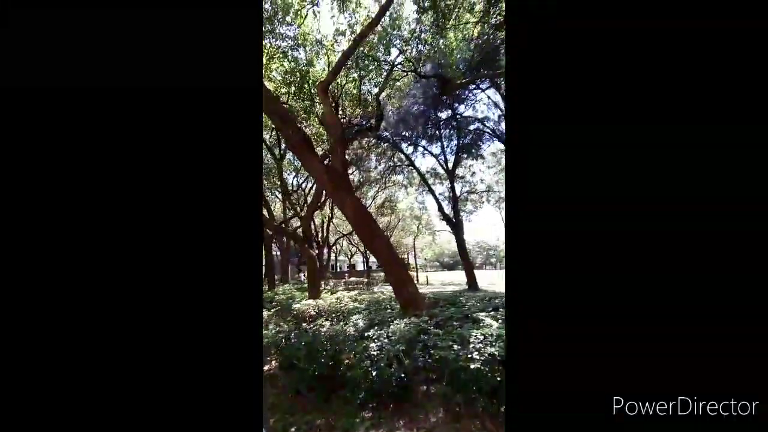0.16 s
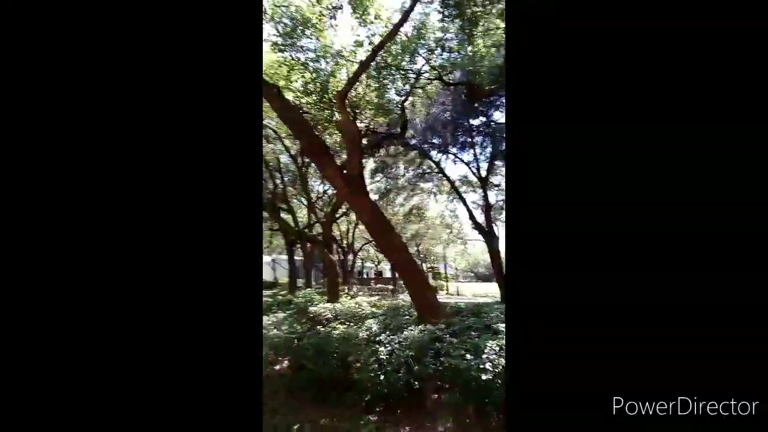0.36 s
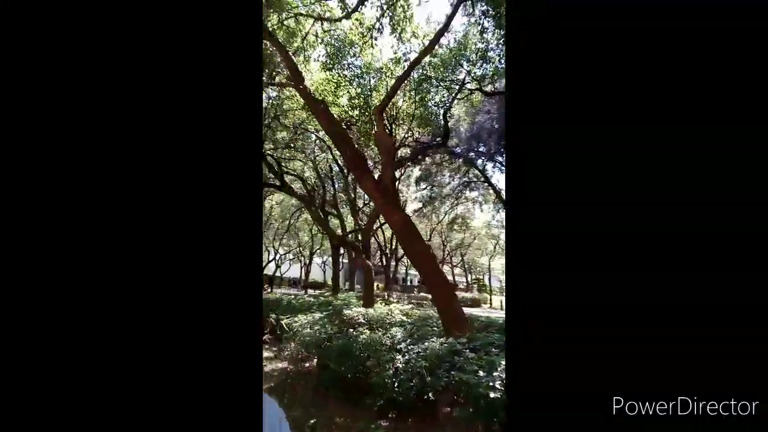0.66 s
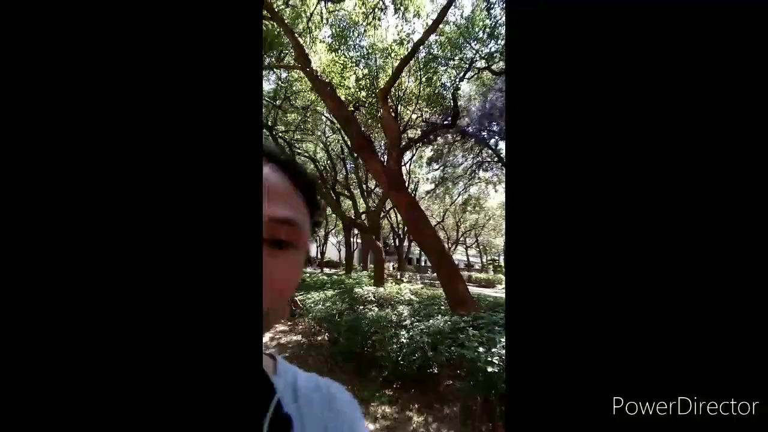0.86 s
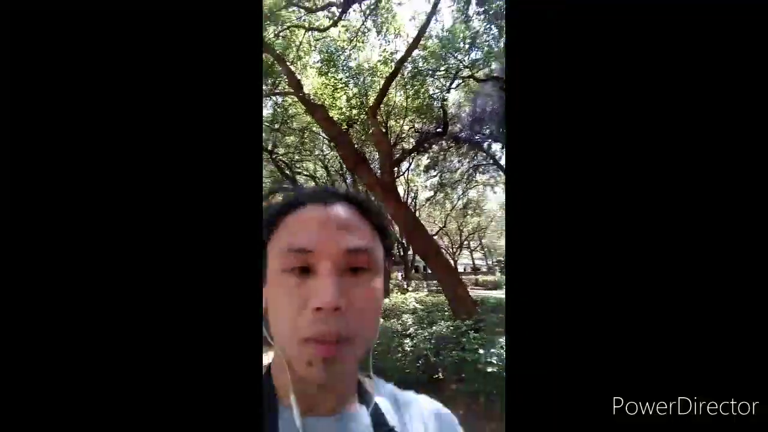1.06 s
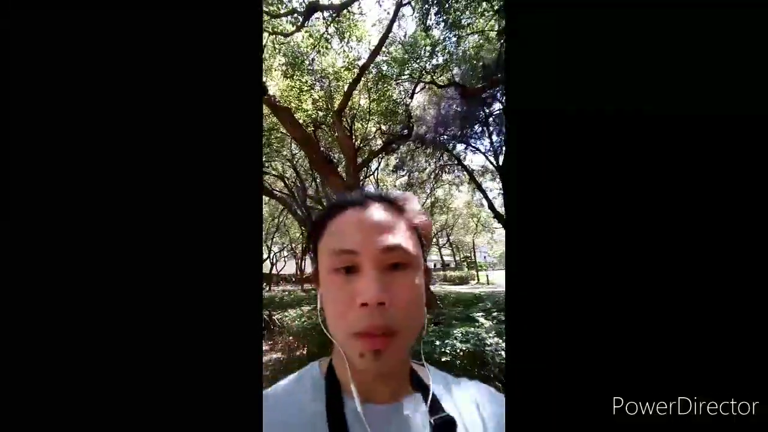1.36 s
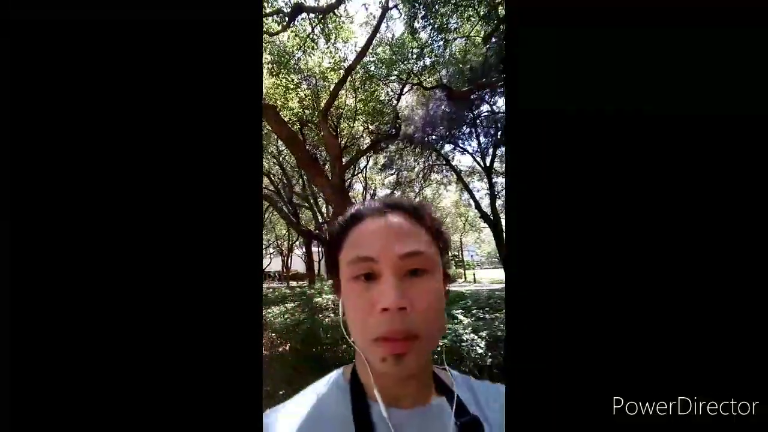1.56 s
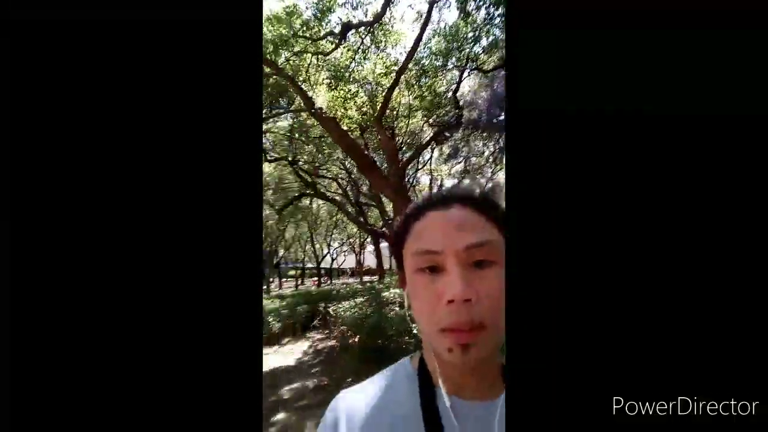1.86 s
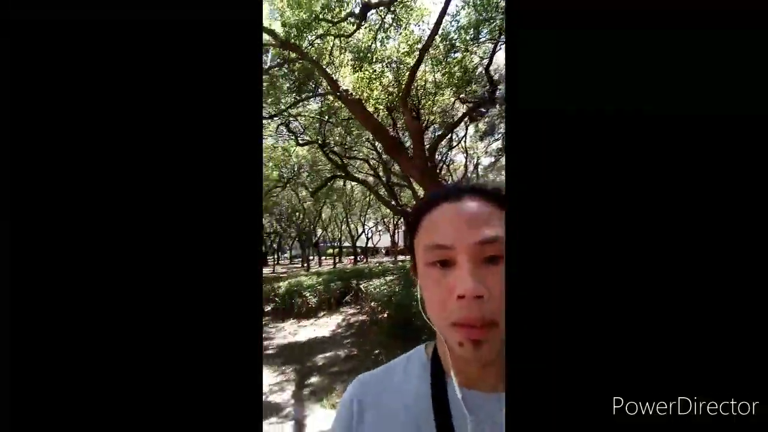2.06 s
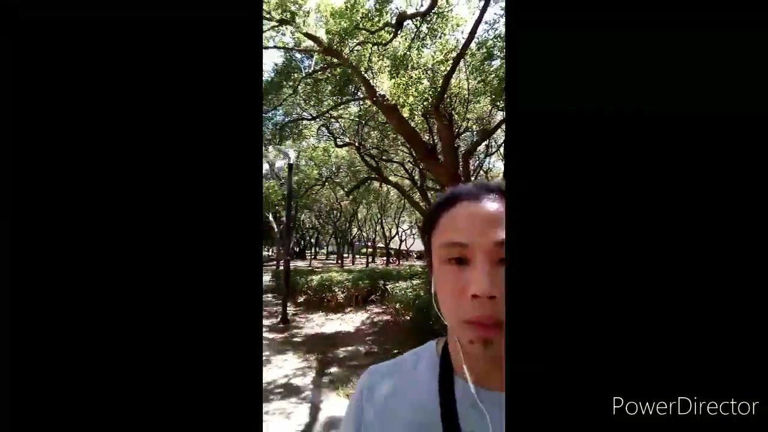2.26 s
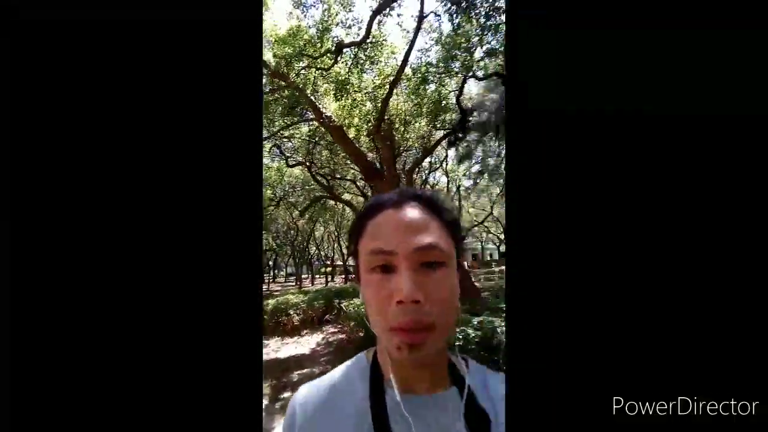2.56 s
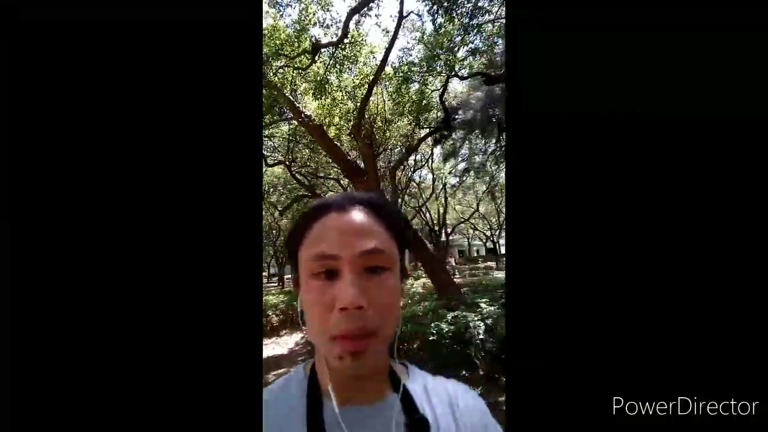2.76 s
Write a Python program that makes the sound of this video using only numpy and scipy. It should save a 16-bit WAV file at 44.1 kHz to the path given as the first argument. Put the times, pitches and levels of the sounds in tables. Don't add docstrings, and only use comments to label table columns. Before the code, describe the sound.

Many cicadas drone continuously around a leafy park, with a nearer singer fading out and returning; small twig ticks, one short hoarse cluck and low far traffic, captured by a phone microphone.

```python
import sys
import numpy as np
from scipy import signal
from scipy.fft import rfft, irfft, next_fast_len
from scipy.io import wavfile
from scipy.ndimage import uniform_filter1d, map_coordinates

SR = 44100
rng = np.random.default_rng(int(sys.argv[2]) if len(sys.argv) > 2 else 0)


def volts(x):
    e = np.asarray(x, float) / 20
    return 10 ** e


def unload_audio(sound):
    columns = np.transpose(np.atleast_2d(sound))
    steps = np.round(np.clip(columns, -1, 1) * 32767)
    wavfile.write(sys.argv[1], SR, steps.astype(np.int16))


N = 127890


def unit(x):
    return x / np.sqrt(np.mean(x ** 2) + 1e-20)


def along(points, hz):
    f, v = np.transpose(points)
    return volts(np.interp(np.log(hz + 1), np.log(f + 1), v, left=-120, right=-120))


def level(rows):
    s, db = np.transpose(rows)
    return volts(np.interp(np.arange(N) / SR, s, db))


def wobble(rate):
    knots = rng.standard_normal(int(N * 40 / SR) + 4)
    return map_coordinates(knots, [np.arange(N) * min(rate, 40) / SR])


def filtered(x, response):
    m = next_fast_len(N + SR // 2)
    return irfft(rfft(x, m) * response(np.fft.rfftfreq(m, 1 / SR)), m)[..., :N]


def clicks(rate_hz, jitter, drift):
    size_db = 3
    turns = np.cumsum(rate_hz * (1 + drift * wobble(3))) / SR + rng.random()
    chance = rng.standard_normal((2, 6000))
    k = np.arange(1, int(turns[-1]))
    at = np.interp(k + jitter * chance[0, k], turns, np.arange(N))
    at = np.clip(at, 8, N - 9)
    taps = at.astype(int)[:, None] + np.arange(-7, 9)
    offset = taps - at[:, None]
    shape = np.sinc(offset) * np.cos(np.pi * offset / 18) ** 2
    size = volts(size_db * chance[1, k])[:, None]
    return np.bincount(taps.ravel(), (shape * size).ravel(), N)


def trees(x, echo_db):
    t60_s = 0.45
    t = np.arange(SR // 2) / SR
    tail = rng.standard_normal(len(t)) * volts(-60 * t / t60_s)
    return x + volts(echo_db) * signal.fftconvolve(x, tail / np.linalg.norm(tail))[:N]


def insect(waver_db):
    rate_hz = 327.6 * np.exp(0.35 * rng.standard_normal())
    return volts(waver_db * wobble(5.84)) * clicks(rate_hz, jitter=0.0401, drift=0.006)


def chorus(body, swell, waver_db, count):
    # centre in Hz, lift in dB.
    sacs = [(4430, 5), (4688, 2), (4803, 5), (5105, 4), (5340, 7), (5510, 5), (5636, 3), (5990, 5),
            (6209, 3), (6440, 5), (6930, 3), (7360, 4), (7965, 2), (8879, 2)]
    sac_width_hz, gust_db = 26, 0.2
    crowd = np.zeros(N)
    for _ in range(count):
        singers = insect(waver_db) + insect(waver_db) + insect(waver_db)
        crowd += trees(singers, 2)

    def response(f):
        lift_db = sum(db * sac_width_hz ** 2 / ((f - hz) ** 2 + sac_width_hz ** 2) for hz, db in sacs)
        return along(body, f) * volts(lift_db)

    return level(swell) * volts(gust_db * wobble(8.14)) * unit(filtered(crowd, response))


def low_species():
    # time in seconds, level in dB.
    swell = [(0.0, -32.5), (0.48, -31.5), (1.26, -31.5), (1.53, -29), (1.66, -30), (2.13, -26),
             (2.19, -26.5), (2.21, -26), (2.29, -27.5), (2.4, -24.5), (2.41, -25.5), (2.9, -26)]
    # frequency in Hz, gain in dB.
    body = [(3180, -55), (5400, -9.5), (5750, -11.5), (5820, -7), (6210, -2.5), (7320, 0.5), (7620, -1.5),
            (8520, -9), (9800, -16), (12700, -21), (21600, -120)]
    return chorus(body, swell, waver_db=1.1, count=5)


def high_species():
    # time in seconds, level in dB.
    swell = [(0.0, -31), (0.02, -35.5), (0.25, -37.5), (0.26, -39), (0.6, -37), (0.61, -38.5),
             (1.82, -32.5), (2.29, -37), (2.3, -37), (2.9, -35)]
    # frequency in Hz, gain in dB.
    body = [(5290, -27), (9000, -7), (9680, -6), (10500, -.5), (11300, -3), (12000, -12.5), (12700, -19),
            (16500, -22.5)]
    return chorus(body, swell, waver_db=0.8, count=4)


def deep_singers():
    # time in seconds, level in dB.
    swell = [(0.0, -40.5), (0.61, -37), (0.99, -39), (1.03, -42), (2.47, -40), (2.71, -44.5), (2.76, -41),
             (2.89, -42.5), (2.9, -35)]
    # frequency in Hz, gain in dB.
    body = [(2000, -21), (3400, -18.5), (3590, -17), (3890, -8), (4150, -6), (4720, 2), (5800, -2),
            (7540, -24), (12800, -120)]
    return chorus(body, swell, waver_db=1, count=5)


def near_singer():
    # time in seconds, level in dB.
    song = [(0, -38.5), (1.3, -83), (1.9, -40), (2.3, -34.5), (2.9, -35.5)]
    # frequency in Hz, gain in dB.
    body = [(4100, -43), (4700, -5), (5340, -3), (6400, -7), (7500, -7), (8200, -42)]
    buckling = trees(clicks(520, jitter=0.018, drift=0.001924), 2)
    ringing = unit(filtered(buckling, lambda f: along(body, f)))
    return level(song) * volts(1.5 * wobble(6.37)) * ringing


def traffic():
    # frequency in Hz, gain in dB.
    colour = [(12, -30), (20, -3), (38, -6), (126, 0.5), (487, -6), (608, -6.5), (1680, -15), (3280, -17),
              (4000, -17), (5200, -52), (8800, -120)]
    # time in seconds, level in dB.
    strength = [(0.0, -43), (1.58, -44.5), (1.61, -46.5), (1.65, -44.5), (2.16, -44), (2.27, -44),
                (2.37, -44.5), (2.9, -43.5)]
    mains_hz, mains_db = 116, -57
    rumble = unit(filtered(rng.standard_normal(N), lambda f: along(colour, f)))
    road = rumble * level(strength) * volts(0.2 * wobble(4.75))
    mains = np.sin(2 * np.pi * mains_hz * np.arange(N) / SR)
    return road + volts(mains_db + 0.5 * wobble(4)) * mains


def twigs():
    # centre time in seconds, centre in Hz, length in seconds, level in dB.
    ticks = [
        (.27, 1200, .035, -51),
        (.609, 11500, .0015, -40),
        (.914, 14600, .004, -42),
        (.888, 1500, .004, -50),
        (2.28, 95, .08, -45),
        (1.91, 2400, .045, -47),
        (2.0, 2000, .05, -51),
    ]
    width = 0.22
    t = np.arange(N) / SR
    out = np.zeros(N)
    for s, hz, length, db in ticks:
        noise = filtered(rng.standard_normal(N), lambda f: np.exp(-(np.log((f + 1) / hz) / width) ** 2))
        out += volts(db) * np.exp(-((t - s) / length) ** 2) * unit(noise)
    return out


def bird():
    # start in seconds, start Hz, end Hz, length in seconds, level in dB.
    notes_sung = [(1.849, 1750, 1650, .012, -46), (1.865, 1750, 1650, 0.0083, -39),
                  (1.869, 3000, 2490, 0.011, -36.5), (1.876, 2500, 2110, 0.011, -32),
                  (1.884, 3350, 3300, .014, -44), (1.902, 2450, 2220, 0.0154, -40.5),
                  (1.914, 1950, 1820, 0.012, -38), (1.906, 3776, 3800, 0.048, -41.5),
                  (1.925, 2950, 2830, 0.011, -37.5), (1.928, 1900, 1577, 0.0138, -32),
                  (1.949, 3914, 3737, .072, -42), (2.015, 3730, 3740, .12, -52),
                  (1.998, 1800, 1680, 0.0083, -43), (2.014, 1750, 1720, 0.02, -48)]
    trill_hz, trill_depth = 110, 0.65
    out, t = np.zeros(N), np.arange(N) / SR
    trill_phase = 2 * np.pi * np.cumsum(trill_hz * (1 + 0.298 * wobble(40))) / SR
    trill = 1 + trill_depth * np.sin(trill_phase)
    for s, a_hz, b_hz, length, db in notes_sung:
        u = np.clip((t - s) / length, 0, 1)
        glide = 2 * np.pi * np.cumsum(a_hz * (b_hz / a_hz) ** u) / SR
        note = volts(db) * np.sin(np.pi * u) ** 0.83 * np.sin(glide)
        out += note * (trill if length > 0.03 else 1)
    hoarse = 1 + 0.35 * unit(filtered(rng.standard_normal(N), lambda f: f < 300))
    return trees(out * hoarse, -10)


def scene():
    bugs = low_species() + high_species() + deep_singers() + near_singer()
    return np.tile(bugs + traffic() + twigs() + bird(), (2, 1))


def masked_thinning(x):
    mask_db, scatter_db, floor = -32.3, 4, 0.04
    mask_from_hz, steady_mask_hz = 2400, 12000
    keep_db = -8
    hz, _, z = signal.stft(x, SR, nperseg=2048, noverlap=1536)
    power = uniform_filter1d(abs(z) ** 2, size=16, axis=0)
    power = uniform_filter1d(power, size=4, axis=1)
    patches = uniform_filter1d(rng.standard_normal(z.shape), size=8, axis=0)
    patches = uniform_filter1d(patches, size=5, axis=1)
    field = volts(2 * scatter_db * unit(patches))
    loudest = uniform_filter1d(power.max(0), size=12)
    masker = np.where((hz > steady_mask_hz)[:, None], np.median(loudest), loudest)
    masked = masker * volts(2 * mask_db) * field * (hz > mask_from_hz)[:, None]
    step = np.maximum(masked, power * volts(2 * keep_db))
    strong_line = 1 + (step / (abs(z) ** 2 + 1e-20)) ** 2
    strong_patch = 1 + (masked / (power + 1e-20)) ** 3
    keep = floor + (1 - floor) / strong_line / strong_patch
    return signal.istft(z * keep, nperseg=2048, noverlap=1536)[1][:N]


def top_cut(x):
    return signal.sosfilt(signal.butter(12, 15500, fs=SR, output="sos"), x)


def record(dry):
    # centre time in seconds, low Hz, high Hz, dB over
    fills = [(0.627, 6300, 7600, 0), (.628, 9100, 10400, -3), (.628, 11100, 12500, -3),
             (.837, 8140, 10500, -8), (1.371, 5170, 6300, -5), (1.371, 10300, 12500, -2),
             (2.183, 7000, 8160, 0.5), (2.369, 4570, 5800, -4), (2.555, 5770, 6750, -3),
             (2.625, 6800, 8400, -5), (2.625, 10300, 12500, -3)]
    fill_s, fill_takes = 0.031, 0.26
    mono = masked_thinning(filtered(dry[0], lambda f: f < 15480))
    t = np.arange(N) / SR
    out = np.tile(mono, (2, 1))
    for s, lo_hz, hi_hz, db in fills:
        gate = np.sin(np.pi / 2 * np.clip(2.1 * (1 - abs(t - s) / (fill_s / 2)), 0, 1)) ** 2
        inside = filtered(mono, lambda f: (f > lo_hz) & (f < hi_hz))
        side = volts(db) * np.roll(inside, SR // 10)
        out = out + gate * (np.array([side, -side]) - fill_takes * inside)
    return top_cut(out)


dry = scene()
out = record(dry)
unload_audio(out)
```